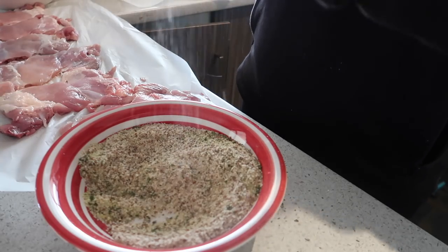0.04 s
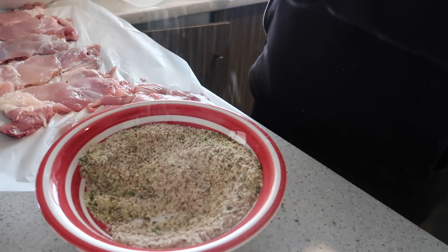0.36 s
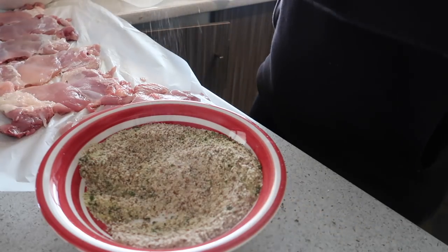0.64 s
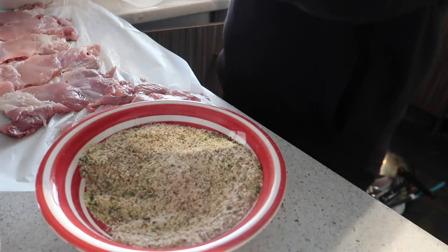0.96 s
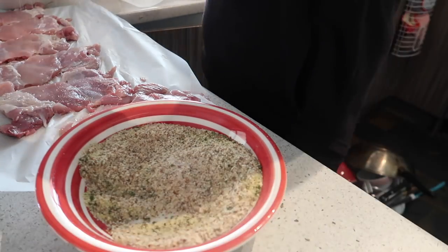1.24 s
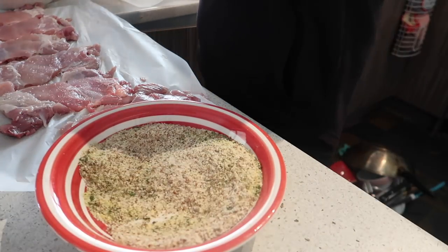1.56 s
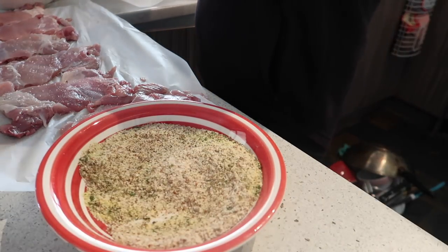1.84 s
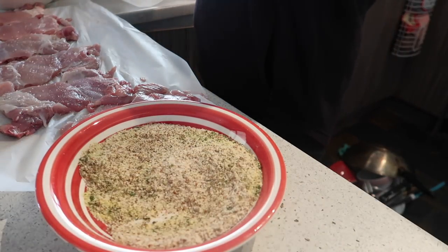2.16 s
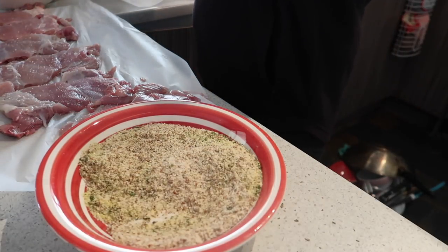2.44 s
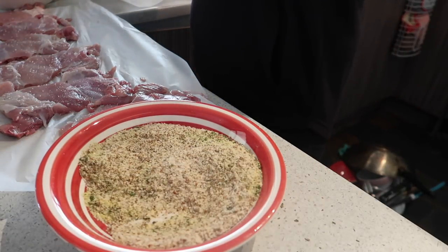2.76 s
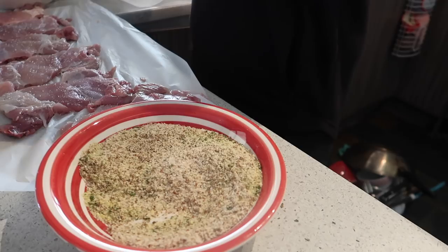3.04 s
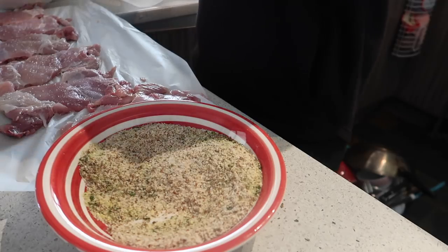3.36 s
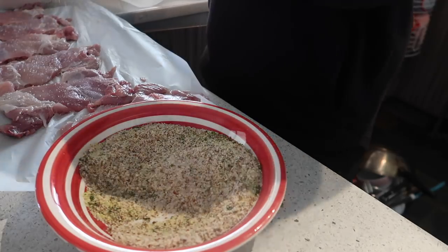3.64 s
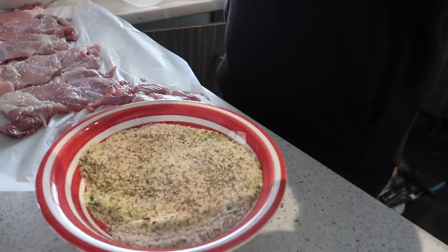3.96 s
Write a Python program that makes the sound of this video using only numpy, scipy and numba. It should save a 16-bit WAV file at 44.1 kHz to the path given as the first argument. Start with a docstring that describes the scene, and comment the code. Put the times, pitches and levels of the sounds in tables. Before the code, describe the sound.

Crisp paper crinkling in short, irregular bursts with sharp snaps in a small kitchen.

```python
"""A small kitchen, where crisp paper is handled and scrunched a little way from the microphone.
Each squeeze is a swarm of tiny buckling creases over a soft flutter of the sheet; single creases
give way with a sharp snap. Worktop and cupboards answer closely, the room rings briefly,
and a low rumble slowly grows underneath a faint hiss."""
import sys
import numpy as np
from scipy import signal
from scipy.fft import rfft, irfft
from scipy.io import wavfile
from numba import njit

SR = 44100
rng = np.random.default_rng(int(sys.argv[2]) if len(sys.argv) > 2 else 0)


def transcribe(u):
    """Save the signal u as a 16-bit wav file named by the first command-line argument.

    u: samples, shape (n,) or (channels, n), limited to [-1, 1]; the rate is SR.
    q: integer samples, one column per channel.
    """
    v = np.clip(np.atleast_2d(u).T, -1, 1)
    q = np.round(v * 32767).astype(np.int16)
    wavfile.write(sys.argv[1], SR, q)


N = 176400

# stereo width of the echoes and the hiss: frequency_hz, side_gain_db
ROOM_WIDTH = [(200, -10), (600, -10), (1400, -14), (2500, -9), (4500, -2), (7500, 0), (11000, -8)]


def undb(db):
    return 10 ** (np.asarray(db) / 20)


def unit(x):
    """Scale to an energy of one."""
    return x / np.sqrt(np.sum(x ** 2, axis=-1, keepdims=True) + 1e-18)


def across(points, size):
    """Read a curve over frequency at the bins of a transform."""
    hz, value = np.array(points, float).T
    return np.interp(np.log(np.fft.rfftfreq(size, 1 / SR) + 1), np.log(hz), value)


def fader(points):
    """Gain for every sample from rows of time_s, level_db."""
    return undb(np.interp(np.arange(N) / SR, *np.array(points).T))


def colour(x, points):
    """Minimum-phase EQ that follows rows of frequency_hz, gain_db."""
    cepstrum = irfft(np.log(undb(across(points, size=2048))))
    cepstrum[1:1024] *= 2
    cepstrum[1025:] = 0
    return signal.fftconvolve(x, irfft(np.exp(rfft(cepstrum))))[:len(x)]


def noise(points):
    """Coloured noise with an rms of one."""
    return unit(colour(rng.standard_normal(N), points)) * np.sqrt(N)


def widen(mid, side, width):
    """Left and right from a mid signal and a side signal shaped by a width curve."""
    return mid + colour(side, width) * np.array([[1], [-1]])


def add(out, at_s, sound):
    """Mix a sound in at a time."""
    i = int(np.clip(at_s * SR, 0, N - 1))
    out[i:i + len(sound)] += sound[:N - i]


def room_tone():
    """A low rumble that swells unevenly, its bass centred, and a faint steady hiss."""
    # tone of the rumble: frequency_hz, gain_db
    rumble_eq = [(30, -12), (50, -1.5), (72, 3.5), (100, -1.5), (150, -3.5), (250, -5.5), (450, -14),
                 (900, -18), (6000, -65)]
    # stereo width of the rumble: frequency_hz, side_gain_db
    rumble_width = [(70, -35), (160, -13), (400, -4.5)]
    # swell of the rumble: time_s, level_db
    swell = [(0, -64), (.77, -57), (2.05, -57), (2.23, -52), (2.45, -55), (2.951, -48.5), (3.2, -49.5),
             (3.8, -51.5), (4, -48.5)]
    # tone of the hiss: frequency_hz, gain_db
    hiss_eq = [(100, -4), (400, -12), (1000, -3.5), (2200, 3), (5500, -3), (13000, -20)]
    rumble = widen(noise(rumble_eq), noise(rumble_eq), rumble_width)
    hiss = widen(noise(hiss_eq), noise(hiss_eq), ROOM_WIDTH)
    return fader(swell) * rumble + undb(-54.5) * hiss


def buckle(hz, cycles, size):
    """One buckle of the paper: a ring that dies within a few cycles."""
    turns = min(hz, SR / 3) * np.arange(size) / SR
    return unit(np.sin(2 * np.pi * turns) * np.exp(-np.pi * turns / max(cycles, .5)))


def swarm(draws, length_s, hz, per_s, cycles, size, spread_octaves=0.49):
    """Buckles popping in and out at random times, pitches and strengths; rms one over the length."""
    span = max(int(length_s * SR), 1)
    out = np.zeros(span + size)
    scatter_db = 4.5
    for k, (when, pitch, strength) in enumerate(draws[:int(per_s * length_s) + 2]):
        i = int(span * (1 + np.tanh(when * np.sqrt(2 / np.pi))) / 2)  # spread almost evenly in time
        gain = (-1) ** k * undb(scatter_db * min(strength, 1.7))
        out[i:i + size] += gain * buckle(hz * 2 ** (spread_octaves * pitch), cycles, size)
    return unit(out) * np.sqrt(span)


def squeezes():
    """The hands take hold and the sheet flutters: a firm squeeze rustles densely, a light one ticks."""
    # squeezes, ahead of the paper's EQ: start_s, length_s, level_db, pitch_hz, flutter_relative_db
    gestures = [ (0.0, 0.048, -43.5, 2570, -12), (0.222, 0.025, -35, 3000, -15),
                (0.251, 0.039, -27, 2860, -13), (0.287, 0.041, -22.5, 2960, -9.5),
                (0.332, 0.037, -33, 2520, -16), (0.392, .11, -48.5, 3160, -30),
                (0.513, 0.025, -38, 2950, -3.5), (0.61, 0.089, -46.5, 3450, 0.5),
                (0.76, 0.029, -39.5, 3360, -4), (0.784, 0.025, -26, 3340, -11.5),
                (0.819, 0.059, -26, 3260, -10), (0.912, 0.22, -51, 3760, -26),
                (1.099, 0.012, -23.5, 2780, -8), (1.229, 0.12, -45, 3400, 3),
                (1.377, 0.064, -49.5, 3460, -24), (1.551, .016, -39, 3200, -11),
                (1.562, 0.02, -26.5, 3060, -5), (1.58, 0.04, -23.5, 3100, -16),
                (1.664, 0.046, -28.5, 3540, -17), (1.724, .04, -41, 3530, -22),
                (1.789, 0.032, -33, 3300, -16), (1.952, 0.057, -36, 2920, -6), (2.009, 0.13, -47, 2850, -8),
                (2.227, 0.036, -33, 3160, -4.5), (2.265, 0.027, -18.5, 3130, -20),
                (2.29, 0.024, -24, 2500, -10), (2.308, 0.034, -24.5, 3300, -7.5),
                (2.374, .047, -24.5, 3120, -19), (2.594, 0.039, -39.5, 2910, -5.5),
                (2.636, 0.05, -35, 2900, 0), (2.709, .10, -45, 2850, -17), (3.026, 0.069, -39, 2750, -2.5),
                (3.13, 0.046, -38.5, 3330, -5.5), (3.261, 0.049, -38, 2870, -3.5),
                (3.336, 0.062, -28.5, 2690, -33), (3.473, 0.032, -19.5, 2730, -16.5),
                (3.54, 0.039, -38.5, 3150, -5), (3.81, 0.052, -35, 2800, -1.5),
                (3.876, 0.068, -41, 2860, -10)]
    # flutter of the sheet as the grip changes: time_s, pitch_hz
    flutter_pitch = [(.33, 810), (.45, 390), (1.2, 358), (1.7, 486), (2.3, 614), (3.5, 404)]
    grip_s, firm_db, doubling_db = .007, -24, 7.5
    out = np.zeros(N)
    draws = rng.standard_normal((len(gestures), 2, 400, 3))
    for (start_s, length_s, db, hz, flutter_db), (fine, broad) in zip(gestures, draws):
        creases_per_s = 1800 * 2 ** ((db - firm_db) / doubling_db)
        crackle = swarm(fine, length_s, hz, creases_per_s, cycles=2.8, size=256)
        attack = 1 - np.exp(-np.arange(len(crackle)) / SR / grip_s)
        add(out, start_s, undb(db) * crackle * attack)
        flutter_hz = np.interp(start_s, *np.array(flutter_pitch).T)
        flutter = swarm(broad, length_s, flutter_hz, per_s=400, cycles=3.5, size=1500,
                        spread_octaves=0.42)
        add(out, start_s, undb(db + flutter_db) * flutter)
    return out


def snaps():
    """A stiff crease gives way, then settles with a brief run of smaller buckles."""
    # snapping creases, ahead of the paper's EQ: start_s, level_db, pitch_hz
    creases = [ (0.0490, -28.5, 2920), (0.2493, -16, 2860), (0.2641, -16.5, 2940), (0.3064, -17.5, 2620),
               (0.3357, -15.5, 2370), (0.4425, -38, 2700), (0.4897, -34, 2980), (0.5175, -26.5, 2900),
               (0.5978, -19.5, 3100), (0.5999, -20, 2980), (0.627, -42, 3200), (0.7537, -27.5, 3700),
               (0.8270, -17, 2400), (0.8367, -13.5, 3350), (0.855, -17.5, 4830), (0.8737, -16.5, 2720),
               (0.9640, -34, 3480), (1.088, -6, 2970), (1.222, -20, 2800), (1.2767, -28, 3360),
               (1.3858, -34.5, 2670), (1.589, -17.5, 3640), (1.6248, -14, 3040), (1.6728, -15.5, 3430),
               (1.7020, -20, 3350), (1.7869, -15, 3670), (1.962, -48, 2870), (2.095, -33.5, 4000),
               (2.1236, -25.5, 2660), (2.2897, -8.5, 3040), (2.4161, -16.5, 3530), (2.6054, -30.5, 3000),
               (2.667, -27.5, 3090), (2.772, -28.5, 3100), (2.9841, -34, 2710), (3.0116, -26, 3330),
               (3.0241, -20.5, 2780), (3.038, -24.5, 3100), (3.1315, -22, 3170), (3.1524, -28, 2940),
               (3.3298, -11, 2700), (3.3382, -12.5, 3460), (3.461, -15, 3370), (3.463, -12, 2970),
               (3.5388, -9.5, 3410), (3.6334, -33, 3760), (3.719, -25.5, 3800), (3.8173, -22, 3180),
               (3.8235, -21, 3100), (3.8447, -33, 2930), (3.9212, -37, 3130), (3.941, -26.5, 4200)]
    ring_cycles, rebound_s, rebound_db = 4.77, .002, -0.5
    out = np.zeros(N)
    for (start_s, db, hz), draws in zip(creases, rng.standard_normal((len(creases), 16, 3))):
        strength = undb(db) * np.sqrt(SR / 1000)  # the energy of one millisecond at this level
        add(out, start_s, strength * buckle(hz, ring_cycles, size=400))
        rebound = swarm(draws, rebound_s, hz, per_s=1800, cycles=ring_cycles, size=400)
        add(out, start_s, strength * undb(rebound_db) * unit(rebound))
    return out


@njit
def resonate(x, hz, width_hz):
    """Sweepable band-pass with a gain of one at its centre."""
    out, band, low = np.empty(len(x)), 0., 0.
    for i in range(len(x)):
        tuning, damping = np.tan(np.pi * hz[i] / SR), width_hz / hz[i]
        ring = (band + tuning * (x[i] - low)) / (1 + tuning * (tuning + damping))
        band, low = 2 * ring - band, low + 2 * tuning * ring
        out[i] = damping * ring
    return out


def hollow(paper):
    """The folded paper cups some air, whose resonance shifts and fades as the grip changes."""
    # resonance of the cupped air: time_s, pitch_hz, gain_db
    air_pocket = [(.3, 2050, -2), (.85, 2120, -2), (1.1, 2300, -11), (1.75, 2710, 5), (2.3, 1830, -6.5),
                  (3.5, 2250, -3.5)]
    times, hz, db = np.array(air_pocket).T
    t = np.arange(N) / SR
    ring = resonate(paper + 1e-18, np.interp(t, times, hz), width_hz=480.)
    return paper + undb(np.interp(t, times, db)) * ring


def echoes(size):
    """Impulse response: close reflections from worktop and cupboards, then a short diffuse tail."""
    # ring of the kitchen: frequency_hz, t60_s
    decay_times = [(200, 0.31), (550, 0.82), (1600, 0.7), (3700, 0.47), (6500, 0.48), (12000, 0.22)]
    first_echo_s, early_s, build_s = 0.0016, 0.017, 0.0019
    early_db, tail_db = -6.5, -9
    t = np.arange(size) / SR
    spectrum, t60 = rfft(rng.standard_normal(size)), across(decay_times, size)
    bands = np.floor(2 * np.log2(np.fft.rfftfreq(size, 1 / SR) + 100))  # roughly half octaves
    tail = np.zeros(size)
    for band in np.unique(bands):
        inside = bands == band
        tail += irfft(spectrum * inside, size) * undb(-60 * t / t60[inside].mean())
    tail *= 1 - np.exp(-t / build_s)
    early = rng.standard_normal(size) * rng.exponential(1, size) / (1 + (t / early_s) ** 8)
    return (t > first_echo_s) * (undb(tail_db) * unit(tail) + undb(early_db) * unit(early))


def kitchen(paper, crossfades):
    """The paper moves in the hands, so its pattern of echoes blends from one place to the next."""
    # reverb send as the paper moves away from the microphone: time_s, level_db
    send_level = [(1.15, -2), (1.7, 1), (3.5, -0.5)]
    send = paper * fader(send_level)
    mid, side, step = np.zeros(N), np.zeros(N), N // crossfades
    for centre in range(0, N + 1, step):
        span = np.arange(max(centre - step, 0), min(centre + step, N))
        part = send[span] * np.cos(np.pi / 2 * (span - centre) / step)
        for out in (mid, side):
            add(out, span[0] / SR, signal.fftconvolve(part, echoes(size=16384)))
    return widen(mid, side, ROOM_WIDTH)


def microphone_ports(pair):
    """The treble reaches the left port earlier and a little stronger."""
    # phase of the left port ahead of the right: frequency_hz, lead_rad
    left_lead = [(100, 0), (3200, .12), (4900, 1.35), (6900, 1.75), (8300, 1.9), (10000, 2.5), (13000, 2.7)]
    # level of the left port above the right: frequency_hz, excess_db
    left_excess = [(100, 0.2), (2300, 0.27), (4400, 1.7), (9000, 0.62)]
    half_tilt = np.exp(.5j * across(left_lead, 2 * N)) * undb(across(left_excess, 2 * N) / 2)
    return irfft(rfft(pair, 2 * N) * np.array([half_tilt, 1 / half_tilt]))[:, :N]


def scene():
    """The paper, its echoes and the room tone at the two microphone ports."""
    # crisp tone of the paper: frequency_hz, gain_db
    paper_eq = [(60, -33), (200, -17.5), (380, -6), (590, -15), (780, -13.5), (1050, -9), (1400, 0),
                (2100, -2), (3100, -5.5), (4200, 0.5), (5800, 6.5), (6900, 2), (9000, 5.5), (12500, 7.5),
                (15500, -9)]
    bed = room_tone()
    paper = hollow(colour(squeezes() + snaps(), paper_eq))
    return microphone_ports(paper + kitchen(paper, crossfades=7) + bed)


def record(dry):
    """The recorder clips at full scale and cuts the top."""
    top_hz = 15700
    lowpass = signal.ellip(8, .2, 80, top_hz, fs=SR, output="sos")
    return signal.sosfilt(lowpass, np.clip(dry, -1, 1))


dry = scene()
out = record(dry)
transcribe(out)
```